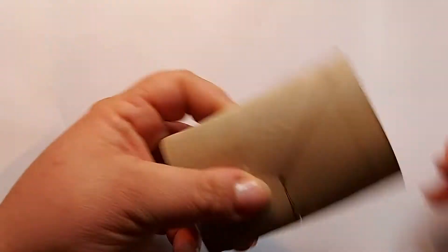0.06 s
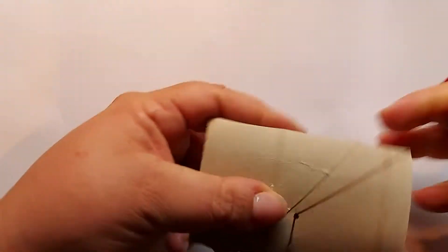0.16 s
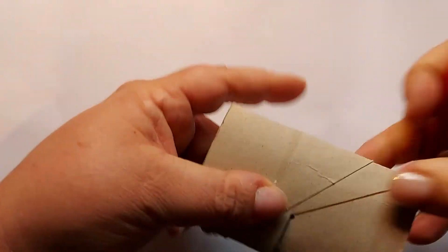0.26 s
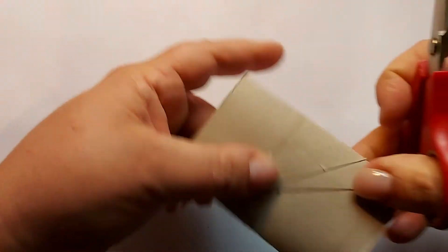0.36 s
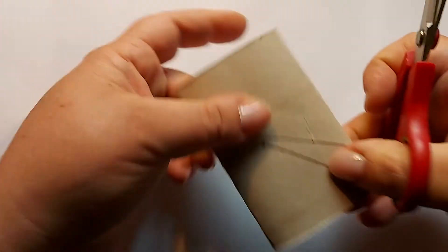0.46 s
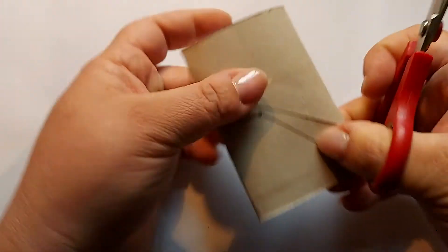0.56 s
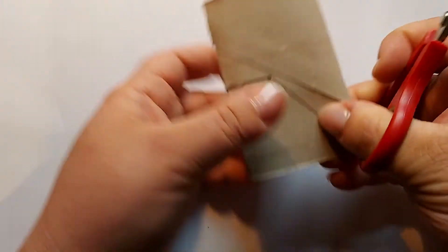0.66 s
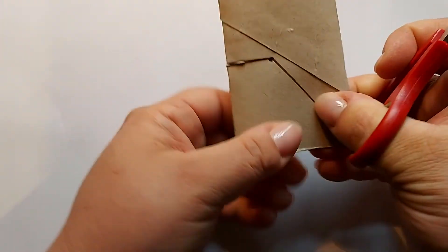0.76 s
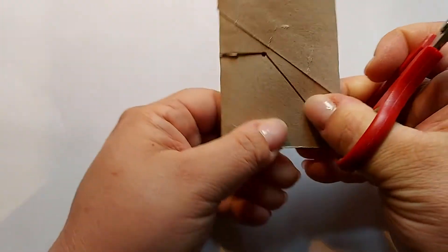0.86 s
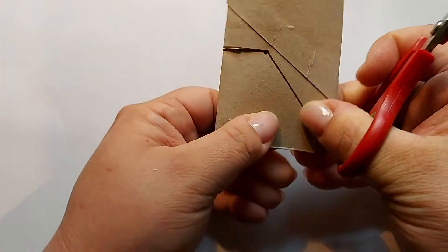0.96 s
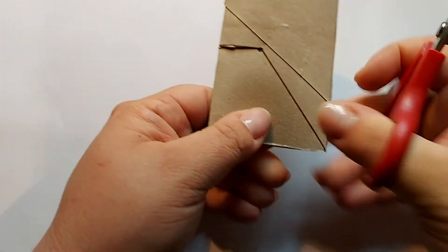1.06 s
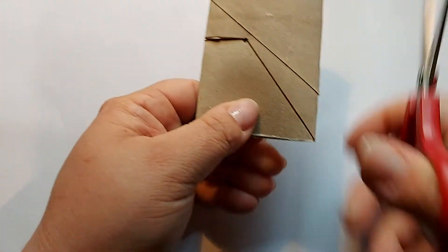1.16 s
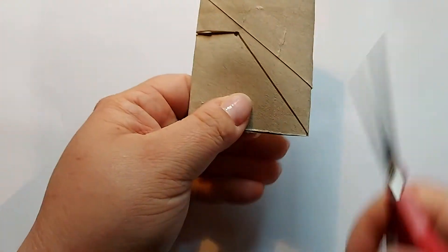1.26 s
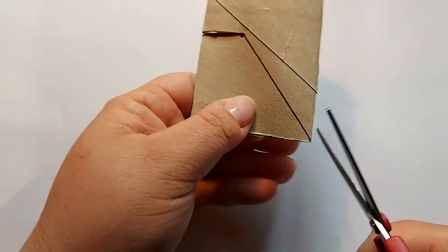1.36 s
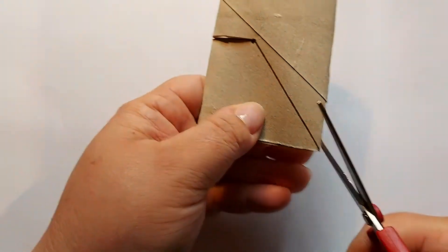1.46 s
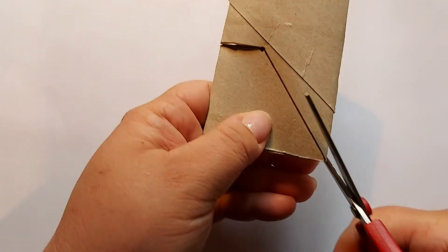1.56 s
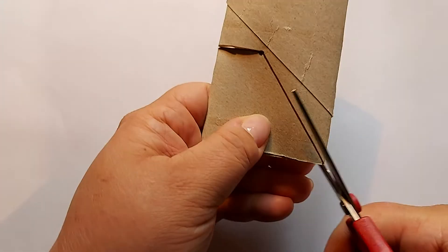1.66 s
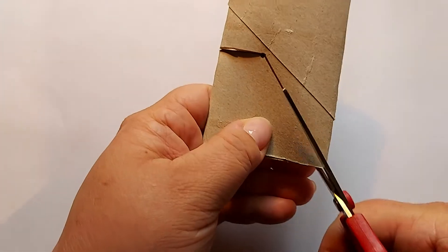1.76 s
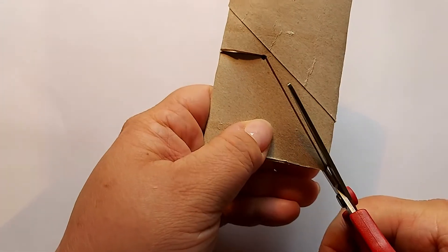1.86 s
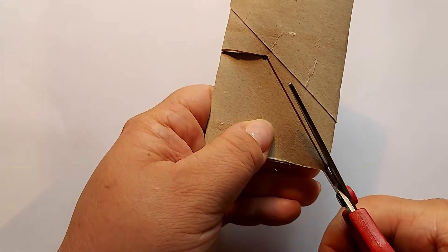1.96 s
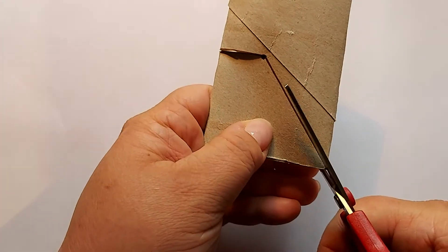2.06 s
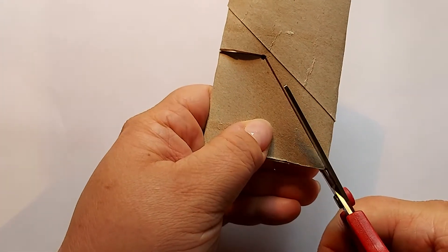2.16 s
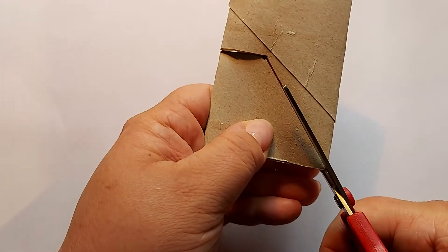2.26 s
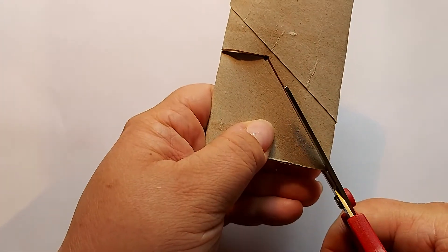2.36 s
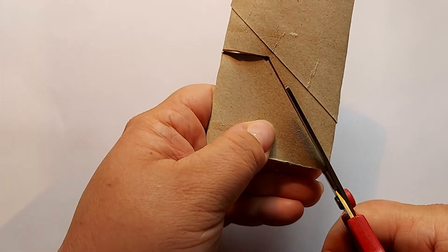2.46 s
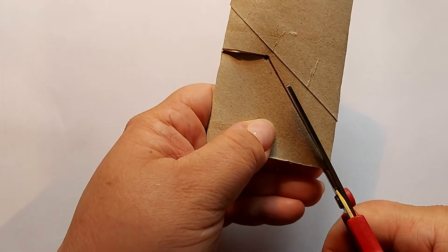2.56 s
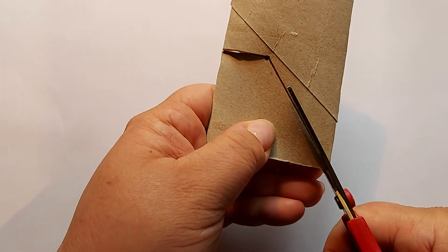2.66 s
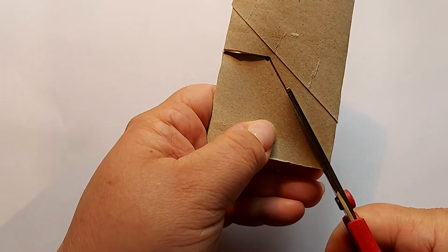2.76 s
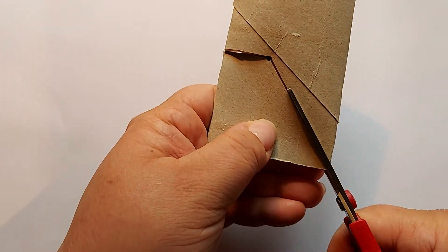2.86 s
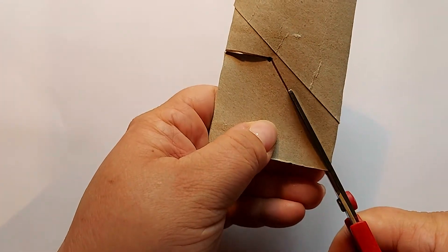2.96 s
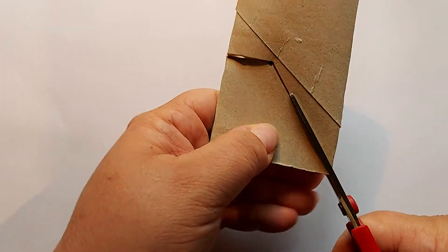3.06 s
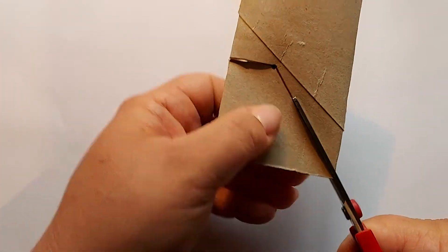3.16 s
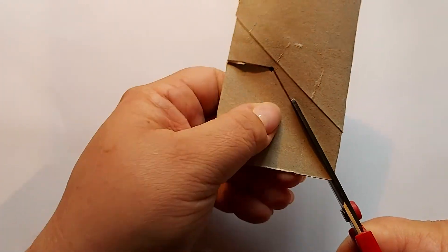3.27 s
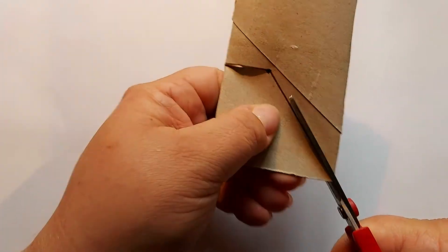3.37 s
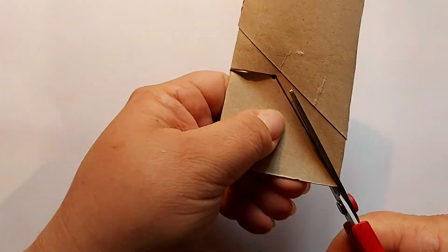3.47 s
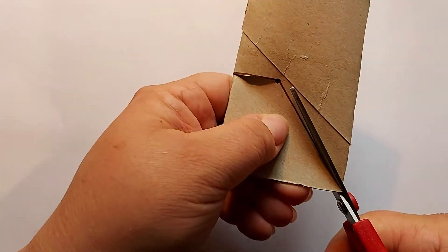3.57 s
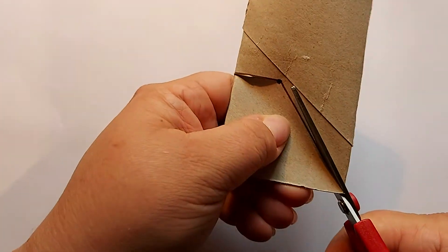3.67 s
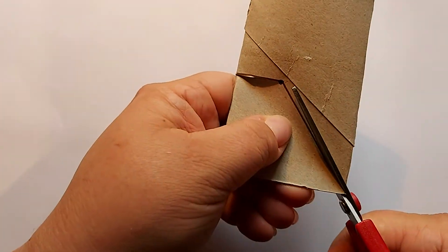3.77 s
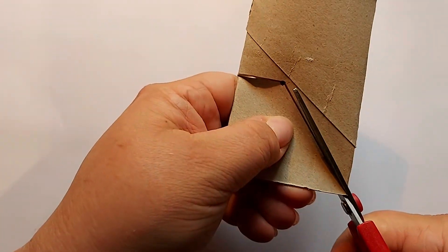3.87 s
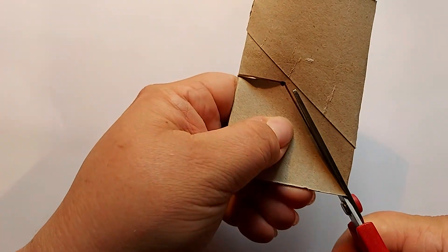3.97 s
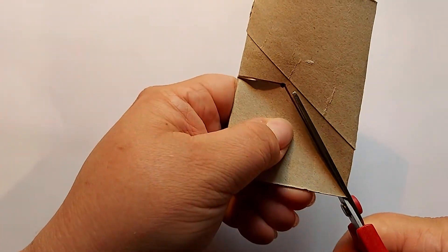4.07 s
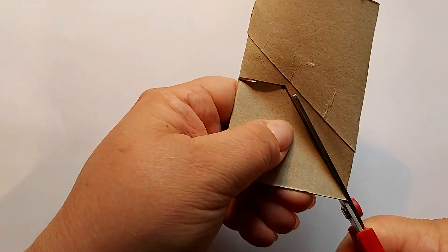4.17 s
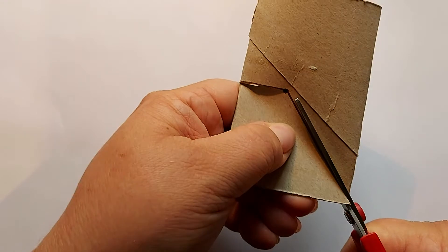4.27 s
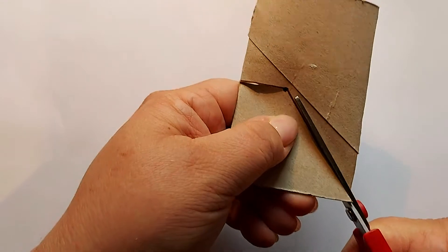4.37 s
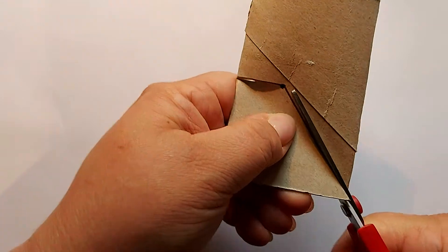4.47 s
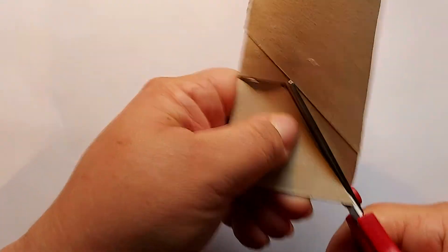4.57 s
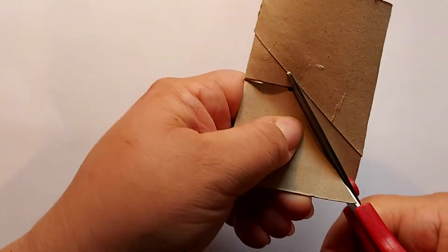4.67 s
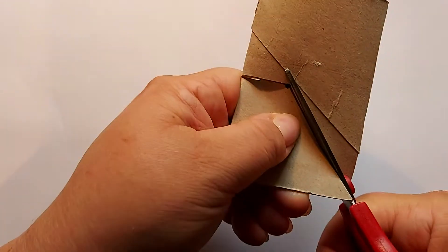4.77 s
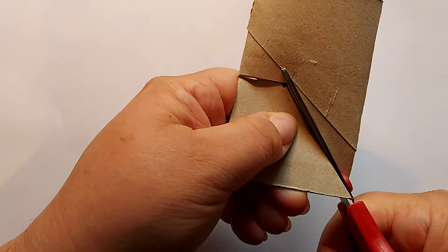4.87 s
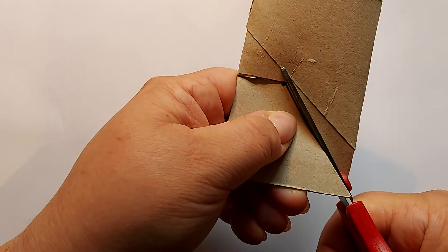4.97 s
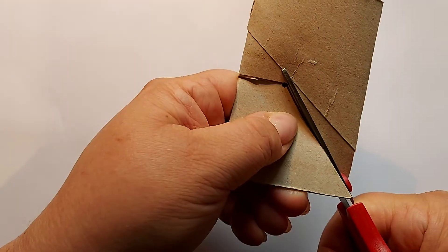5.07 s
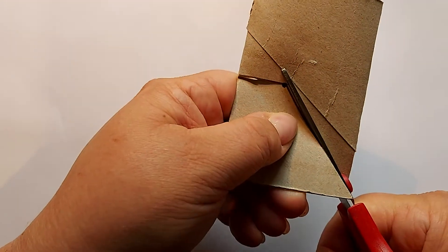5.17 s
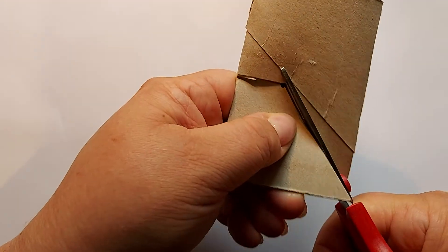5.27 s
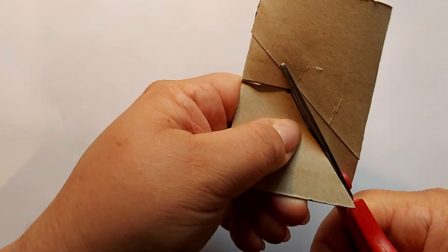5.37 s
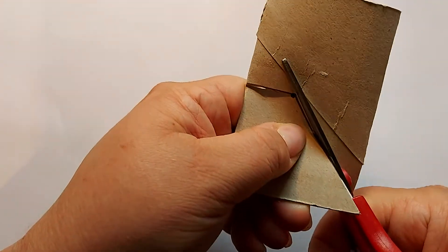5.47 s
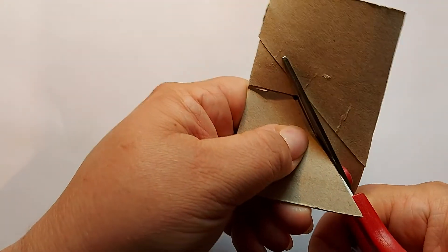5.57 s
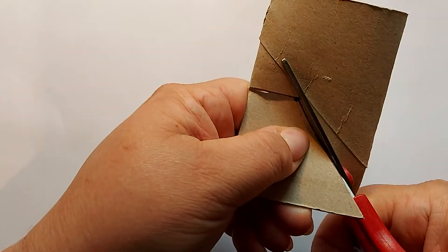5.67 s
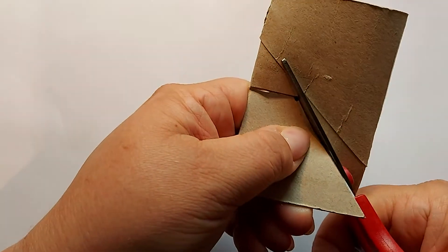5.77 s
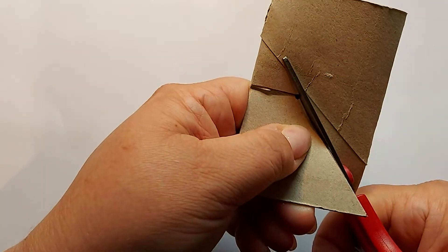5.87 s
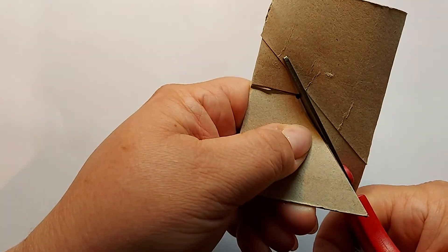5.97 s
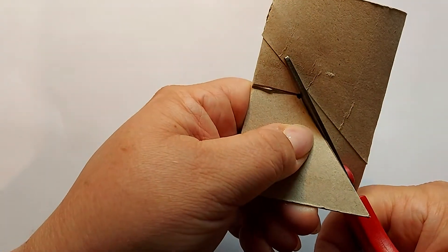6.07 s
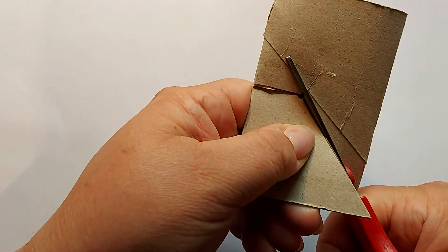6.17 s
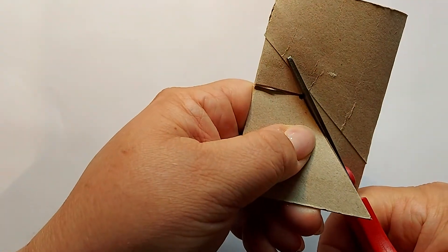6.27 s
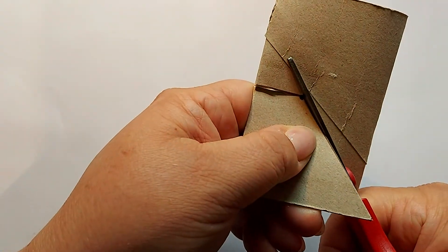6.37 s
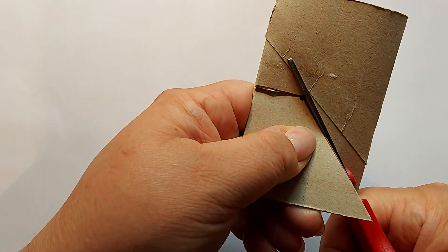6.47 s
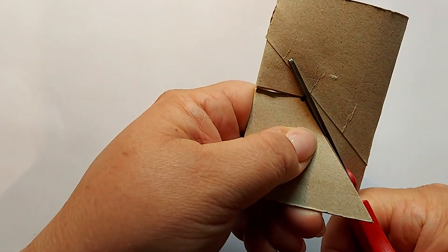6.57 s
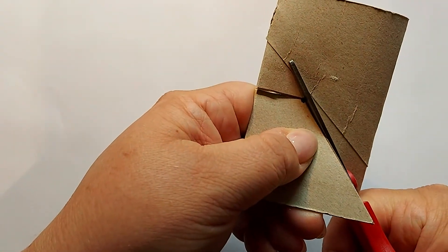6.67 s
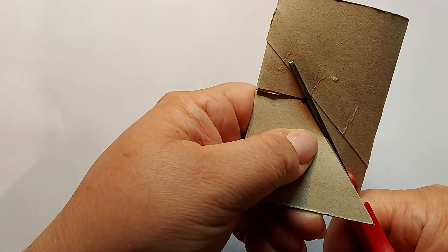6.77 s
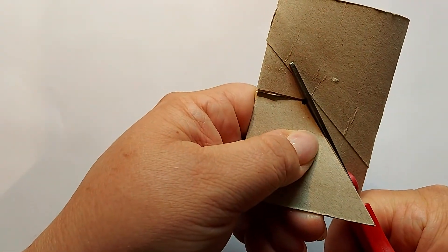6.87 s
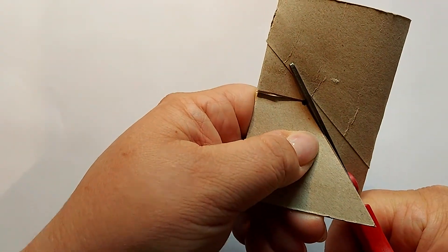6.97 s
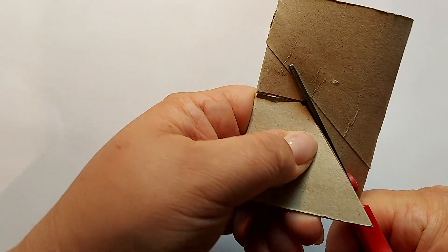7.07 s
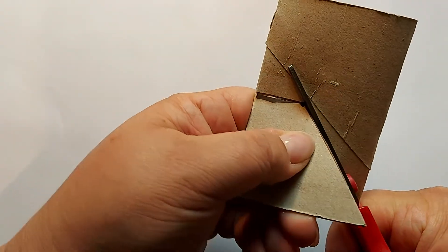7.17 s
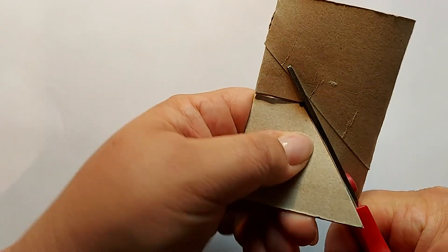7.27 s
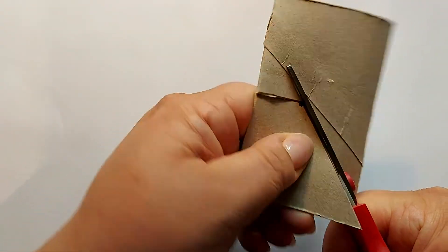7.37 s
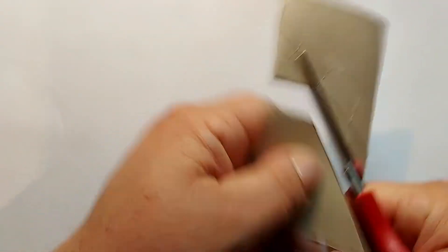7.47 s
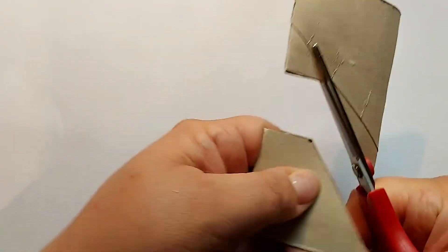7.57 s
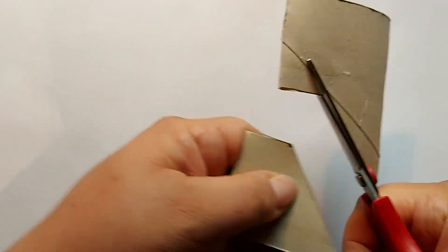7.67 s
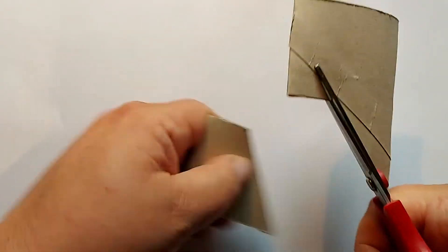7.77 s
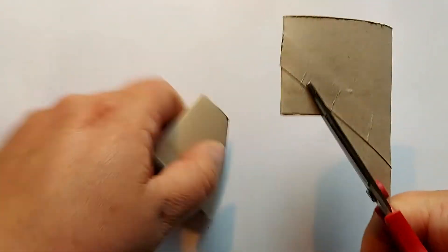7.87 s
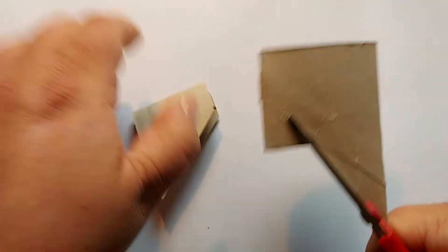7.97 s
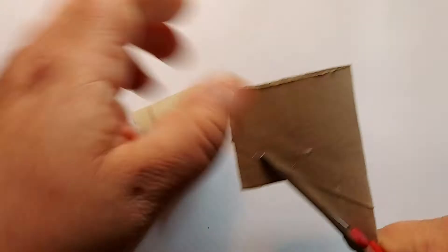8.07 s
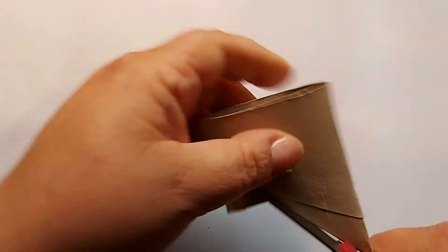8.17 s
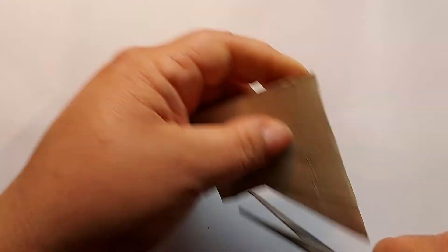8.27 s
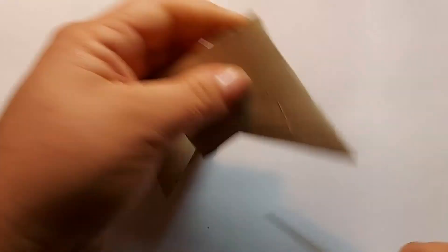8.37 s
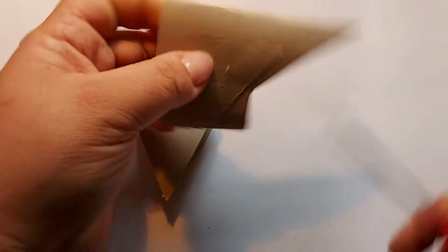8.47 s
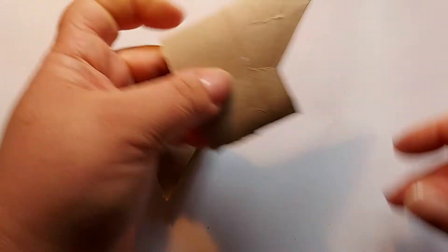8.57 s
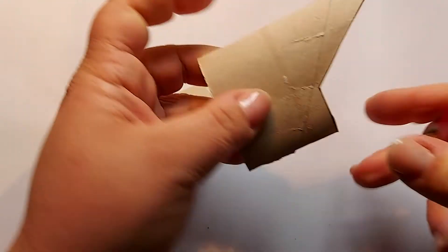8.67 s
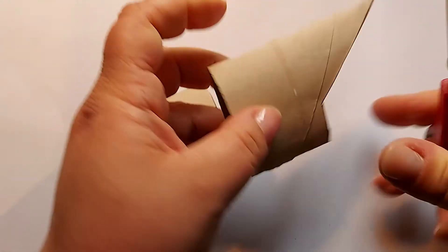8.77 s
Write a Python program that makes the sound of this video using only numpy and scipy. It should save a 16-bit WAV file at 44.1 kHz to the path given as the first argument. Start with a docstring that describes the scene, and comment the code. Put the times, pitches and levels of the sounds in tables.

```python
"""Scissors cut slowly through a flattened cardboard tube, heard close by above a table in a small quiet room.
Breaking fibres excite the card's resonances in short snaps; one loud snap frees the piece.
Fingers and blades rub in dense streams of tiny clicks, shaped by strokes, with sudden short skids.
Steel ticks ring at the blades' modes, a squeak and a deep wobble are unsteady sines, knocks are dull puffs.
Reflections and a diffuse tail make the room; coloured noise and wavering sines make the air and faint hum."""
import sys
import numpy as np
from scipy import signal
from scipy.fft import rfft, irfft, next_fast_len
from scipy.io import wavfile
from scipy.ndimage import uniform_filter1d

SR = 44100
rng = np.random.default_rng(int(sys.argv[2]) if len(sys.argv) > 2 else 0)


def to_wav(s):
    """Save 16-bit WAV."""
    ch = np.atleast_2d(s).T  # columns
    pcm = np.round(np.clip(ch, -1, 1) * 32767)  # PCM
    wavfile.write(sys.argv[1], SR, pcm.astype(np.int16))


N = 388521
TIME = np.arange(N) / SR  # seconds
SPAN = 8192  # samples in which a short sound is made
LOCAL_MS = (np.arange(SPAN) - SPAN // 2) / SR * 1000  # time from the middle of that span
DEEP_S = 5.2  # from here on the blades are wedged deep in the cut


def from_db(db):
    """Level law: decibels become an amplitude gain."""
    return 10 ** (np.asarray(db) / 20)


def rms_one(x):
    """Normalisation to a root mean square of 1."""
    return x / np.sqrt(np.mean(x ** 2) + 1e-20)


def unit_burst(x):
    """Energy normalisation: a short sound gets the energy of 4 ms at rms 1."""
    return rms_one(x) * np.sqrt(.004 * SR / x.shape[-1])


def at_hz(points, size):
    """Interpolation on a logarithmic pitch axis: a (Hz, value) table read at the bins of a transform."""
    hz, value = np.transpose(points)
    bins_hz = np.arange(size // 2 + 1) * SR / size
    return np.interp(np.log(bins_hz + 1), np.log(hz), value)


def coloured(x, spectrum):
    """Linear filtering: each frequency is scaled by a (Hz, dB) table."""
    size = next_fast_len(x.shape[-1])
    return irfft(rfft(x, size) * from_db(at_hz(spectrum, size)), size)[..., :x.shape[-1]]


def paired(two, likeness):
    """Partial coherence: a shared and an opposed noise mix into left and right of given correlation."""
    size = next_fast_len(two.shape[-1])
    mid, side = rfft(two, size)
    alike = np.clip(at_hz(likeness, size), -1, 1)
    shared = np.sqrt(1 + alike) * mid
    opposed = np.sqrt(1 - alike) * side * [[1], [-1]]
    return irfft(shared + opposed, size)[:, :two.shape[-1]]


def band(x, low_hz, high_hz, order=2):
    """Band limiting by a Butterworth filter."""
    edges_hz = [low_hz, min(high_hz, .45 * SR)]
    return signal.sosfilt(signal.butter(order, edges_hz, "band", fs=SR, output="sos"), x)


def resonate(x, hz, width_hz):
    """Damped resonance: a pole pair whose radius sets the bandwidth, gain 1 on top."""
    r = np.exp(-np.pi * width_hz / SR)
    zeros = np.array([1, 0, -1]) * (1 - r * r) / 2
    poles = [1, -2 * r * np.cos(2 * np.pi * hz / SR), r * r]
    return signal.lfilter(zeros, poles, x + 1e-18)


def body(x, modes):
    """Modal superposition: resonances in parallel, signs alternating."""
    return sum((-1) ** k * from_db(db) * resonate(x, hz, width)
               for k, (hz, width, db) in enumerate(modes))


def grains(size, spread_db):
    """Random excitation: two unrelated streams of tiny fibre clicks of uneven size."""
    unevenness = np.minimum(rng.exponential(1, (2, size)), 5)
    return rng.standard_normal((2, size)) * from_db(spread_db * unevenness)


def swell(rise_ms, fall_ms):
    """Exponential growth to a peak in the middle of the span, then decay, by two time constants."""
    return np.exp(np.minimum(LOCAL_MS / rise_ms, -LOCAL_MS / fall_ms))


def evened(x, smooth_hz=700):
    """Spectral whitening: a burst divided by its own smoothed magnitude has an even broad colour."""
    spectrum = rfft(x)
    power = uniform_filter1d(np.abs(spectrum) ** 2, max(3, int(smooth_hz * SPAN / SR)))
    return irfft(spectrum / np.sqrt(power + 1e-18))


def add(out, s, sound):
    """Superposition of a short sound centred on time s."""
    start = round(s * SR) - SPAN // 2
    out[:, start:start + SPAN] += sound[..., :N - start]


def tone(curve, jitter):
    """Frequency modulation: a sine follows a (s, Hz, dB rms) curve with random relative jitter."""
    s, hz, db = np.transpose(curve)
    pitch = np.interp(TIME, s, hz) * (1 + jitter * rms_one(band(rng.standard_normal(N), 20, 300)))
    sine = np.sqrt(2) * np.sin(2 * np.pi * np.cumsum(pitch) / SR)
    return sine * np.interp(TIME, s, from_db(db), left=0, right=0)


# Steady hum. Each row: frequency in Hz, level in dB rms.
HUM = [(82.8, -81), (89.7, -76), (199.5, -77), (251.3, -74.5), (427, -81.5), (750, -80)]
# Spectrum of still air. Each row: frequency in Hz, relative level in dB.
AIR_COLOUR = [(15, -28.5), (25, -13), (91, -8.5), (110, -18.5), (255, -9.5), (392, -11), (654, -15),
              (729, -8.5), (955, -16.5), (1090, -18), (1250, -19), (2330, -23), (3220, -37), (15800, -41.5)]
# Left-right likeness of the air. Each row: frequency in Hz, correlation.
AIR_LIKENESS = [(60, 0.54), (200, 0.61), (380, 0), (700, .2), (1300, 0), (15000, 0.013)]


def background(air_db=-66.5, waver=0.46):
    """Stationary noise for still air; narrow-band noise beating against steady sines for a wavering hum."""
    air = rms_one(coloured(paired(rng.standard_normal((2, N)), AIR_LIKENESS), AIR_COLOUR))
    hum = 0
    for hz, db in HUM:
        line = np.sqrt(2) * np.sin(2 * np.pi * (hz * TIME + rng.random()))
        wander = rms_one(resonate(rng.standard_normal(N), hz, 4.0))
        hum = hum + from_db(db) * rms_one((1 - waver) * line + waver * wander)
    return from_db(air_db) * air + hum


# Table and nearby surfaces, left list then right. Each row: delay in ms, gain in dB.
ECHOES = [
    [(2.1, -22), (5.9, -10.5), (7.6, -31.5)],
    [(2.2, -23), (6.4, -29), (8.3, -9.5)],
]
# Strength of the diffuse tail. Each row: frequency in Hz, gain in dB.
ROOM_COLOUR = [(150, -22), (700, -2.5), (1500, -18.5), (3000, -8.5), (6000, -9), (15000, -17.5)]
# Left-right likeness of the tail, and of the rubbing below. Each row: frequency in Hz, correlation.
RUB_LIKENESS = [(700, 0.82), (2400, 0.75), (4400, 0), (8000, 0.012), (15000, 0.38)]


def room(x, build_ms=3.2, t60_s=0.19):
    """Convolution with an impulse response: a few near reflections, then a short diffuse tail."""
    t = TIME[:SR // 3]
    decay = from_db(-60 * t / t60_s) * (1 - np.exp(-(t * 1e3 / build_ms) ** 2))
    tail = paired(rng.standard_normal((2, len(t))), RUB_LIKENESS) * decay
    response = coloured(rms_one(tail) / np.sqrt(len(t)), ROOM_COLOUR)
    for channel, echoes in enumerate(ECHOES):
        for ms, db in echoes:
            response[channel, round(ms * SR / 1000)] += from_db(db)
    return x + signal.fftconvolve(x, response, axes=1)[:, :N]


# A short deep wobble. Each row: time in seconds, pitch in Hz, level in dB rms.
WOBBLE = [(7.0, 33.2, -77), (7.07, 33, -47.5), (7.12, 33.7, -55), (7.2, 33.3, -56), (7.26, 32.6, -76)]


def wobble():
    """Frequency modulation of a very low sine."""
    return tone(WOBBLE, jitter=.03)


# Hands and card knock. Each row: peak in seconds, level in dB before room and placing,
# decay constant in ms, middle of the band in Hz.
KNOCKS = [(1.3, -49, 74, 266), (4.15, -65, 25, 200), (4.6, -55, 18, 90), (4.84, -78, 14, 90),
          (5.816, -44.5, 64, 78), (6.186, -44.5, 2.8, 380), (7.589, -40.5, 2.4, 790),
          (7.83, -48.5, 18, 231), (7.895, -47, 14, 695)]


def knocks():
    """Soft impact: a long contact excites low frequencies only, a dull puff."""
    out = np.zeros((2, N))
    for s, level_db, ms, hz in KNOCKS:
        puff = band(rng.standard_normal(SPAN) * swell(ms / 2, ms), hz / 1.41, hz * 1.48)
        add(out, s, from_db(level_db) * unit_burst(puff))
    return out


# Steel touches steel. Each row: peak in seconds, level in dB before room and placing, decay constant in ms.
TICKS = [(1.497, -64, 1.4), (6.186, -48, 1.2), (7.398, -48.5, 1.7), (7.573, -29.5, 1.5), (7.59, -31, 1.1),
         (8.6865, -37, 0.87)]
# What the blades ring with. Each row: frequency in Hz, width in Hz, gain in dB.
STEEL_MODES = [(7150, 60, -3), (9200, 50, -3), (13300, 110, 4), (12700, 2200, 3.5)]


def ticks(contact_db=-7):
    """Modal excitation: a hard contact sets the blades ringing briefly."""
    out = np.zeros((2, N))
    for s, level_db, ms in TICKS:
        touch = grains(SPAN, spread_db=0.5) * swell(1.1, ms)
        contact = from_db(contact_db) * band(touch, 600, 13000, order=1)
        add(out, s, from_db(level_db) * unit_burst(body(touch, STEEL_MODES) + contact))
    return out


# The blade squeaks in the cut. Each row: time in seconds, pitch in Hz, level in dB before room and placing.
SQUEAK = [(6.36, 3180, -98), (6.39, 3170, -77), (6.43, 3080, -74), (6.48, 3250, -82), (6.51, 3300, -84),
          (6.55, 3250, -100)]


def squeak():
    """Frequency modulation of a faint high sine."""
    return tone(SQUEAK, jitter=.012)


def shifting(x, depth_db=2.9):
    """Time-varying filtering: the travelling contact favours now these pitches, now those."""
    spectra = signal.stft(x, nperseg=1024)[2]
    chance = rng.standard_normal(spectra.shape[1:])
    favour = rms_one(uniform_filter1d(uniform_filter1d(chance, size=7, axis=0), size=5, axis=1))
    return signal.istft(spectra * from_db(depth_db * favour))[1][:, :x.shape[-1]]


def crackle(size, per_s):
    """Poisson-like excitation: single fibres tear at random, each with a tick at one of nine pitches."""
    out = np.zeros(size)
    for hz in np.geomspace(1400, 6500, 9):
        torn = (rng.random(size) < per_s / 9 / SR) * rng.uniform(-1, 1, size)
        out += resonate(torn, hz, hz / 3)
    return rms_one(out)


def friction(course, colour, ring_hz, ring_db, rustle_db, hiss_db, catch_db, crackle_db, top_db):
    """Friction noise: dense clicks that catch unevenly, heard through the card and as surface hiss."""
    s, rustle, hiss = np.transpose(course)
    on = (TIME >= s[0]) & (TIME < s[-1])
    t = TIME[on]
    catching = from_db(catch_db * rms_one(band(rng.standard_normal(len(t)), 10, 250)))
    sliding = rms_one(paired(grains(len(t), spread_db=2.0), RUB_LIKENESS) * catching)
    clicks = coloured(shifting(sliding) + from_db(crackle_db) * crackle(len(t), per_s=130), colour)
    card = band(clicks, 707, 2940, order=4)
    card = rms_one(card + from_db(ring_db) * resonate(card, ring_hz, 170))
    flex = from_db(-20) * rms_one(band(rng.standard_normal(len(t)), 170, 600))
    # the finest grain of the surface adds a sheen on top
    sheen = from_db(top_db) * resonate(clicks, 13000, 4000)
    surface = rms_one(band(clicks + sheen, 3350, 20000, order=4))
    out = np.zeros((2, N))
    out[:, on] = (card + flex) * from_db(np.interp(t, s, rustle) + rustle_db)
    out[:, on] += surface * from_db(np.interp(t, s, hiss) + hiss_db)
    return out


def strokes(rows, shape):
    """Power addition: strokes of one shape sum to a course of (s, card rustle dB, surface hiss dB)."""
    t = np.arange(rows[0][0] - .2, rows[-1][0] + .5, .002)
    rustle = sum((from_db(db) * shape(t, s, length)) ** 2 for s, length, db, _ in rows)
    hiss = sum((from_db(db + hiss_db) * shape(t, s, length)) ** 2 for s, length, db, hiss_db in rows)
    return np.transpose([t, 10 * np.log10(rustle + 1e-20), 10 * np.log10(hiss + 1e-20)])


def before_and_after(rows, shape, change_s):
    """Partition in time: courses of the strokes before and after the card changes its sound."""
    before = [row for row in rows if row[0] < change_s]
    after = [row for row in rows if row[0] >= change_s]
    return strokes(before, shape), strokes(after, shape)


SLIDE_ATTACK_S, SLIDE_RELEASE_S, SLIDE_SAG_DB_PER_S = 0.019, 0.027, 14  # first two are time constants


def slide_shape(t, start_s, length_s):
    """Exponential attack, a hold that slowly weakens, exponential release."""
    age = t - start_s
    attack = np.minimum(age, 0) / SLIDE_ATTACK_S
    release = np.maximum(age - length_s, 0) / SLIDE_RELEASE_S
    return np.exp(attack - release) * from_db(-SLIDE_SAG_DB_PER_S * np.clip(age, 0, length_s))


# Fingers slide over the card. Each row: start in seconds, length of the hold in seconds,
# card rustle in dB before trims, hiss in dB relative to it.
SLIDES = [(0.0, 0.085, -51.5, -4), (0.13, .035, -50.5, -2.5), (0.2, 0.019, -53.5, -6.5),
          (0.325, 0.095, -53, -5), (0.468, 0.079, -53, -7), (0.6, 0.083, -77.5, 8.5), (0.855, .14, -58, -6),
          (1.1, 0.19, -72, 4.5), (1.33, 0.25, -76.5, 1.5), (7.6, .025, -53, 0.5), (7.69, 0.039, -59, 4),
          (7.84, 0.12, -63.5, 9), (8.2, 0.073, -54.5, -4), (8.37, .04, -65.5, 2), (8.44, 0.099, -54, 0.5),
          (8.595, .12, -56.5, -2), (8.775, .035, -61.5, 4)]
# Colour while the tube is whole, and once the piece is free. Each row: frequency in Hz, relative gain in dB.
TURNING_COLOUR = [(410, -36), (700, -16), (852, -17), (922, -23), (1280, -19.5), (2080, -3.5), (2430, -13),
                  (3500, -13.5), (3840, -11), (5060, -13), (12600, -23), (16000, -25)]
PARTING_COLOUR = [(530, -33), (900, -13), (1120, -27), (1640, -6.5), (2500, -7.5), (2730, -4.5), (3730, -2),
                  (6030, -1.5), (12300, -9.5), (16000, -12.5)]


def finger_slides():
    """Sliding friction of skin on card, with another colour once the piece is free."""
    turning, parting = before_and_after(SLIDES, slide_shape, LAST_SNAP[0])
    return (friction(turning, TURNING_COLOUR, ring_hz=2030, ring_db=-6, rustle_db=0.5, hiss_db=-0.5,
                     catch_db=0.0, crackle_db=-15.5, top_db=-18)
            + friction(parting, PARTING_COLOUR, ring_hz=1900, ring_db=-17.5, rustle_db=-2.0, hiss_db=-1.0,
                       catch_db=2.5, crackle_db=-18.5, top_db=-6))


SQUEEZE_EDGE_DB, SQUEEZE_RISE, SQUEEZE_FALL = 7, 2.06, 1.68  # dB down at both ends; powers of the curves


def squeeze_shape(t, middle_s, length_s):
    """Power-law level curve: the blades speed up and slow down again."""
    away = 2 * (t - middle_s) / length_s
    power = np.where(away < 0, SQUEEZE_RISE, SQUEEZE_FALL)
    return from_db(-SQUEEZE_EDGE_DB * np.abs(away) ** power)


# Each squeeze drives the blades a little way on. Each row: middle in seconds, length in seconds,
# card rustle in dB before trims, hiss in dB relative to it.
SQUEEZES = [(1.835, 0.053, -49.5, -13.5), (2.04, 0.037, -53, -13), (2.46, 0.022, -61, -6),
            (2.56, 0.25, -65.5, -5.5), (2.665, 0.029, -61.5, -1.5), (2.73, 0.053, -56.5, -5.5),
            (2.855, 0.16, -54.5, -3.5), (3.12, 0.05, -58, 3), (3.21, 0.047, -53, -3),
            (3.29, 0.039, -57, -8), (3.41, 0.069, -51, 2.5), (3.485, 0.098, -56, -3),
            (3.55, 0.061, -51.5, -2), (3.688, 0.04, -60.5, -1), (3.78, 0.21, -79.5, 2),
            (3.968, 0.029, -60, -1), (4.045, 0.077, -61.5, -2.5), (4.16, 0.063, -57, -7),
            (4.28, 0.1, -58, -6), (4.338, .04, -48, -3.5), (4.43, 0.032, -50.5, -7.5),
            (4.488, 0.033, -49, -8.5), (4.548, .045, -48.5, -3.5), (4.62, 0.041, -44, -4),
            (4.765, .05, -68, -2), (4.845, 0.072, -48.5, -3.5), (4.965, .14, -56, -5),
            (5.315, 0.052, -48, -4.5), (5.38, 0.13, -55, -5), (5.467, .04, -49.5, -2),
            (5.525, .06, -60.5, -2), (5.58, 0.042, -53.5, -1), (5.71, .12, -58, -4), (5.86, 0.18, -58, 0),
            (5.99, 0.04, -57, 0), (6.1, 0.068, -58.5, 5), (6.21, .065, -62, 6), (6.32, 0.069, -58.5, 0),
            (6.55, 0.52, -75, -1.5), (6.71, 0.052, -73.5, 11.5), (7.025, .04, -73.5, 0),
            (7.39, 0.065, -50, -3.5)]
# Colour as the blades enter, and once wedged. Each row: frequency in Hz, relative gain in dB.
ENTERING_COLOUR = [(410, -42), (700, -10), (971, -17.5), (1580, -9), (1710, -9.5), (2080, 0), (2370, -9.5),
                   (2800, -13.5), (3110, -13), (8530, -20.5), (13300, -29), (16000, -30)]
WEDGED_COLOUR = [(410, -36), (700, -7.5), (1180, -14.5), (1540, -5), (2300, -7), (2590, -4), (3240, -12),
                 (3940, -3.5), (4990, -13), (10900, -22), (13000, -20.5), (16000, -28.5)]


def blade_squeezes():
    """Sliding friction of steel in card, with another colour once the blades are wedged."""
    entering, wedged = before_and_after(SQUEEZES, squeeze_shape, DEEP_S)
    return (friction(entering, ENTERING_COLOUR, ring_hz=2140, ring_db=-19, rustle_db=0.0, hiss_db=0.0,
                     catch_db=2.0, crackle_db=-15.0, top_db=-1)
            + friction(wedged, WEDGED_COLOUR, ring_hz=2650, ring_db=-8.0, rustle_db=-1.0, hiss_db=-1.0,
                       catch_db=1.0, crackle_db=-7.5, top_db=-23.5))


# A blade or finger lets go. Each row: peak in seconds, level in dB before room and placing.
SKIDS = [(0.192, -44.5), (0.778, -50), (2.005, -48.5), (2.032, -44.5), (2.548, -50.5), (3.935, -44),
         (4.01, -46.5), (4.046, -54), (4.1, -53), (4.315, -46), (4.523, -43), (5.287, -45), (5.305, -46),
         (5.653, -47), (5.704, -47), (6.05, -45), (8.18, -44)]
# Resonances of the flattened tube, also for the snaps. Each row: frequency in Hz, width in Hz, gain in dB.
CARD_MODES = [(1620, 150, -4), (2087, 67, 4), (2590, 170, -3.5), (3844, 84, -6.5), (4550, 300, -19.5)]
# Colour of breaking fibres, also for the snaps. Each row: frequency in Hz, relative gain in dB.
CRACK_COLOUR = [(2500, -28.5), (4300, 0.5), (5200, -2), (6700, 1), (8700, -3), (10500, -10.5), (12500, -7),
                (16000, -17)]


def skids(fall_ms=10.0, attack_ms=1.6, hiss_db=-14, broad_db=-13):
    """Stick-slip release: a sudden short scrape excites the card and runs out."""
    out = np.zeros((2, N))
    for s, level_db in SKIDS:
        scrape = paired(grains(SPAN, spread_db=3.0), RUB_LIKENESS) * swell(attack_ms, fall_ms)
        card = band(body(scrape, CARD_MODES) + from_db(broad_db) * scrape, 1000, 4800)
        hiss = from_db(hiss_db) * coloured(scrape, CRACK_COLOUR)
        add(out, s, from_db(level_db) * unit_burst(card + hiss))
    return out


# The last strip parts. One row: time in seconds, level in dB before room and placing.
LAST_SNAP = (7.4738, -18)
# What the freed piece rings with. Each row: frequency in Hz, width in Hz, gain in dB.
PIECE_MODES = [(1225, 850, -5), (1580, 240, 4.5), (2590, 250, -2), (3920, 220, -5)]


def last_snap(crack_db=-8, tear_db=-14, thump_db=-27, bright_tail_db=-15, bright_tail_ms=30.0):
    """Impulse excitation: a tear runs into one clean break; the piece rings, a bright noisy tail dies away."""
    s, level_db = LAST_SNAP
    tear = evened(grains(SPAN, spread_db=0.5) * swell(2.6, 1.0))
    clean_break = unit_burst(1.0 * (LOCAL_MS == 0))
    push = clean_break + from_db(tear_db) * unit_burst(tear)
    piece = unit_burst(band(body(push, PIECE_MODES), 950, 5200, order=3))
    thump = from_db(thump_db) * unit_burst(band(push, 60, 750))
    fibres = from_db(crack_db) * unit_burst(coloured(tear, CRACK_COLOUR))
    tail_noise = grains(SPAN, spread_db=1.5) * swell(1.0, bright_tail_ms)
    bright_tail = from_db(bright_tail_db) * unit_burst(band(tail_noise, 1200, 12000))
    out = np.zeros((2, N))
    add(out, s, from_db(level_db) * (piece + thump))
    add(out, s + 0.00076, from_db(level_db) * (fibres + bright_tail))
    return out


# The panel flexes more when the flap rings near its resonance: dB re the snap, extra dB in tune, octaves.
FLEX_DB, FLEX_IN_TUNE_DB, FLEX_REACH_OCT = -12.5, 15.5, 0.32
# A harder snap puts more into the card than into the crack: dB at the usual level, that level, dB per dB.
CRACK_DB, USUAL_SNAP_DB, CRACK_LOSS = -8, -37.5, 0.052
LOOSE_CRACK_DB = 5.5  # how much crisper the card cracks once the piece is free
WEDGED_CRACK_DB = 3  # gain of the crack while the card wraps the blades
# Its duller colour meanwhile. Each row: frequency in Hz, relative gain in dB.
WEDGED_CRACK_COLOUR = [(2500, -38), (3900, 4.5), (5000, 4), (6200, 1), (7500, -4.5), (10500, -13),
                       (12500, -14), (16000, -22)]
# The card gives way. Each row: time in seconds, level in dB before room and placing,
# rise and decay constant in ms, flap pitch in Hz.
SNAPS = [(0.2829, -46, 2, 1990), (0.314, -42, 0.7, 1880), (0.7818, -45, 2.3, 2140),
         (2.7777, -42.5, 2.1, 1450), (2.7972, -42, 1.9, 1800), (2.8337, -43, 3.2, 2720),
         (2.8756, -38.5, 0.89, 1770), (2.9009, -38.5, 4.8, 2170), (2.958, -45.5, 1.6, 1760),
         (3.053, -44, 9, 1530), (4.1338, -38, 4.9, 1660), (4.1546, -43.5, 2.9, 2900),
         (4.1664, -42, 2, 2400), (4.227, -48.5, 1.2, 1900), (4.5903, -27.5, 3, 2190),
         (4.5995, -30.5, 2.3, 1620), (4.609, -37, 4.7, 1830), (4.736, -44.5, 3.3, 1040),
         (4.8147, -41, 2.1, 990), (4.838, -29, 2.2, 970), (4.852, -35.5, 3, 2660), (4.863, -41, 1.4, 1840),
         (4.8834, -42, 2.6, 1640), (4.9258, -32, 1.1, 2650), (4.946, -36, 0.96, 1510),
         (4.9834, -41.5, 2.6, 2700), (5.013, -37.5, 1.7, 2110), (5.0569, -45.5, 3.1, 2040),
         (5.7729, -34, 3.1, 1290), (5.7934, -31, 1.7, 1250), (5.8188, -29.5, 1.3, 2660),
         (5.8614, -33.5, 1.1, 2700), (5.8832, -36.5, 2.6, 1310), (5.9124, -33, 2.1, 2740),
         (5.934, -38, 2.7, 2690), (5.999, -36.5, 2.7, 2180), (6.074, -42.5, 1.5, 900),
         (6.0806, -38, 3.1, 4000), (6.1133, -38, 2.2, 2550), (6.1856, -38, 1, 2940),
         (6.2382, -51, 1.9, 4140), (6.3339, -43.5, 1.7, 2180), (7.5882, -36, 1.8, 2070),
         (8.197, -42, 1, 2040), (8.2141, -45.5, 2, 1500), (8.251, -37.5, 7.4, 1990)]


def snaps(ring_width_hz=150, ring_db=5, broad_db=-12, panel_hz=1040, thump_db=-19, apart_db=-12):
    """Strain release: fibres break in a quick avalanche that excites the modes of the card."""
    out = np.zeros((2, N))
    for s, level_db, ms, ring_hz in SNAPS:
        breaks = evened(grains(SPAN, spread_db=2.5) * swell(ms, ms))
        push = breaks[0] + from_db(apart_db) * breaks[1] * [[1], [-1]]
        # the free flap beside the blade adds a pitch of its own, set for each snap
        flap = from_db(ring_db) * resonate(push, ring_hz, ring_width_hz)
        card = unit_burst(band(body(push, CARD_MODES) + flap + from_db(broad_db) * push, 1290, 4540))
        # the whole panel flexes at its lowest resonance
        octaves_off = np.log2(ring_hz / panel_hz)
        flex_db = FLEX_DB + FLEX_IN_TUNE_DB * np.exp(-(octaves_off / FLEX_REACH_OCT) ** 2)
        panel = from_db(flex_db) * unit_burst(band(resonate(push, panel_hz, 300), 877, 1230))
        thump = from_db(thump_db) * unit_burst(band(push, 110, 610))
        crack_db = CRACK_DB - CRACK_LOSS * (level_db - USUAL_SNAP_DB)
        colour = CRACK_COLOUR
        if s > LAST_SNAP[0]:
            crack_db += LOOSE_CRACK_DB
        elif DEEP_S < s < LAST_SNAP[0]:
            crack_db += WEDGED_CRACK_DB
            colour = WEDGED_CRACK_COLOUR
        fibres = from_db(crack_db) * unit_burst(coloured(paired(breaks, RUB_LIKENESS), colour))
        add(out, s - .0004, from_db(level_db) * (card + panel + thump + fibres))
    return out


def scene():
    """Interaural cues: card and scissors lie a little left, so the right hears them weaker and later."""
    rubs = finger_slides() + blade_squeezes()
    left, right = room(knocks() + ticks() + squeak() + skids() + rubs + last_snap() + snaps())
    near = np.array([from_db(-1.44) * left, from_db(-2.0) * np.roll(right, 2)])  # two samples later
    return near + wobble() + background()


CUTOFF_HZ = 16000


def record(dry):
    """Low-pass filtering: the top is cut steeply, forwards and backwards so that no phase shift is left."""
    return signal.sosfiltfilt(signal.ellip(10, .05, 60, CUTOFF_HZ, fs=SR, output="sos"), dry)


dry = scene()
out = record(dry)
to_wav(out)
```